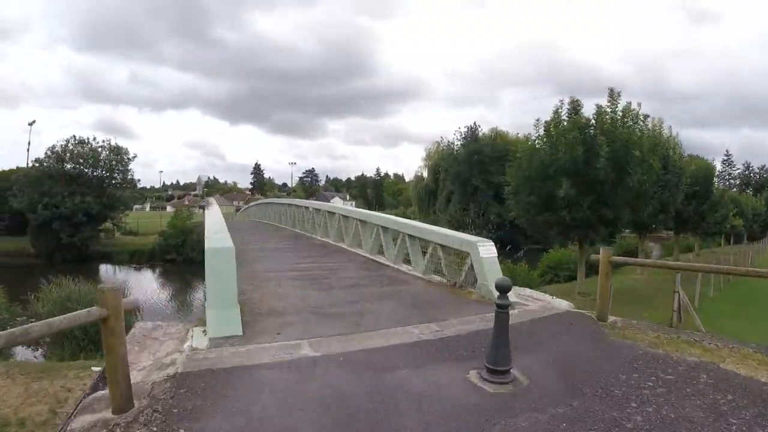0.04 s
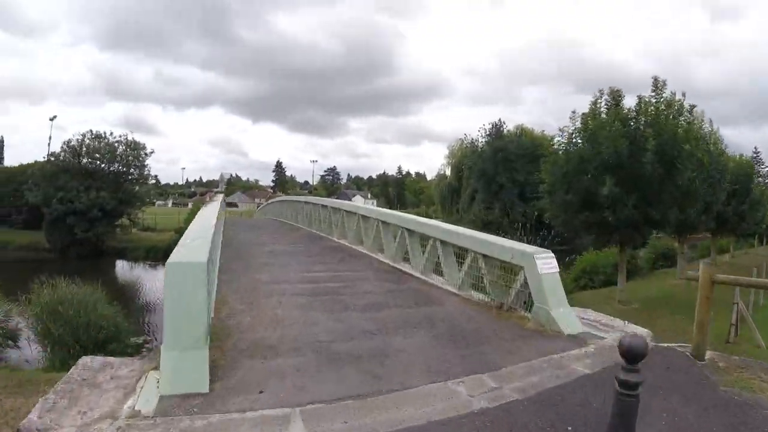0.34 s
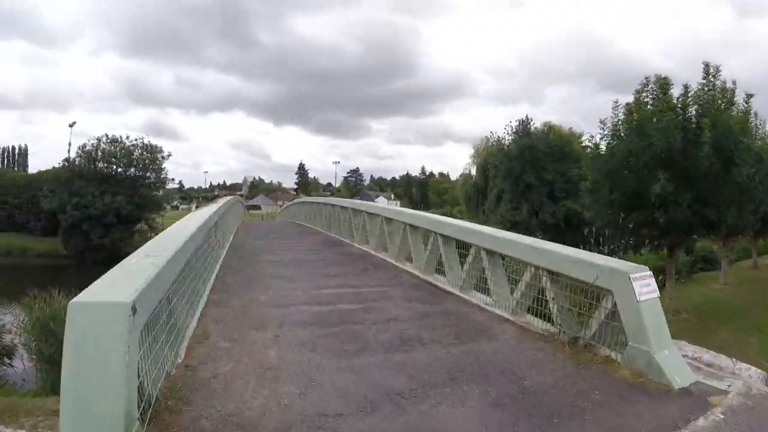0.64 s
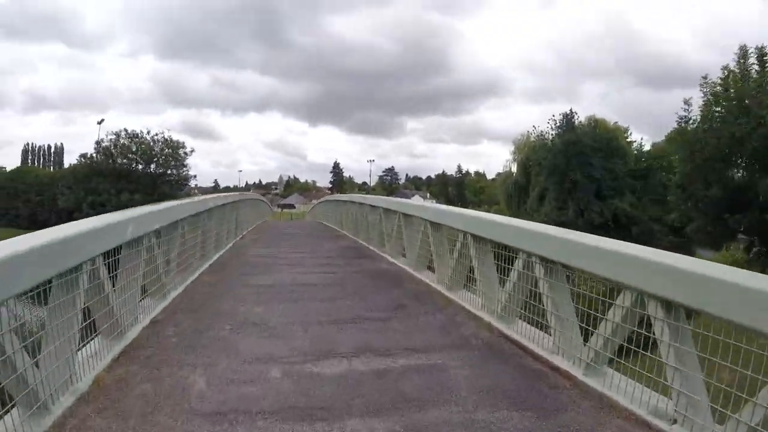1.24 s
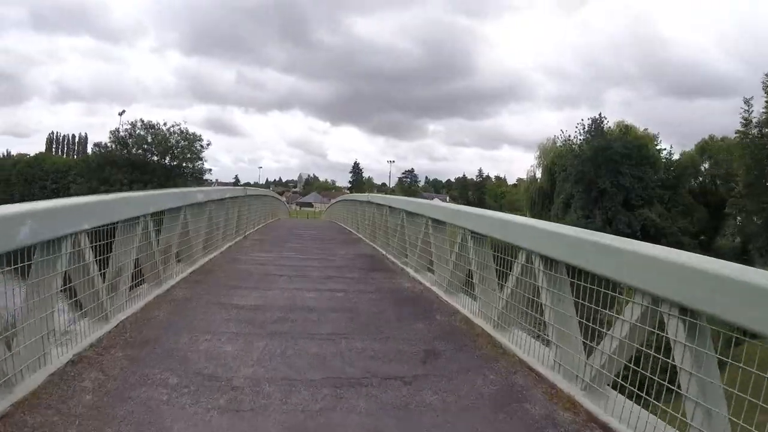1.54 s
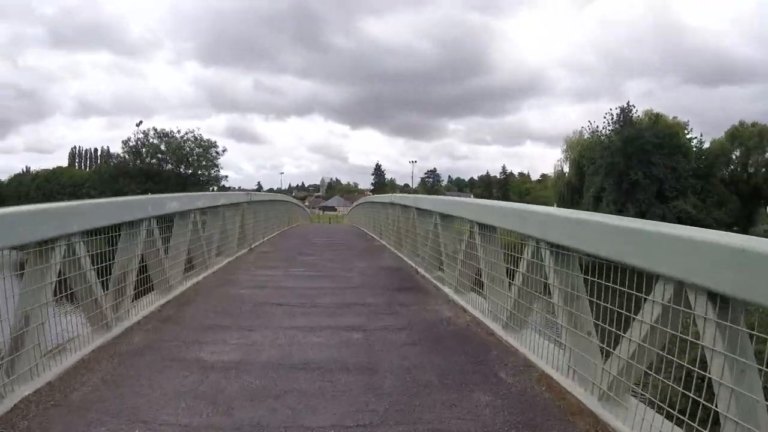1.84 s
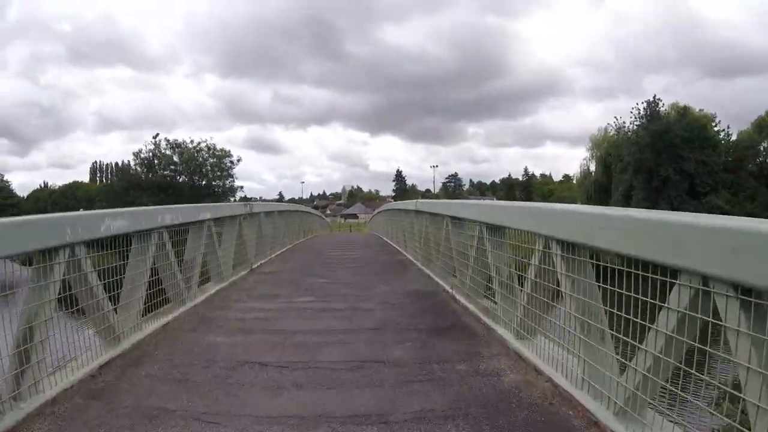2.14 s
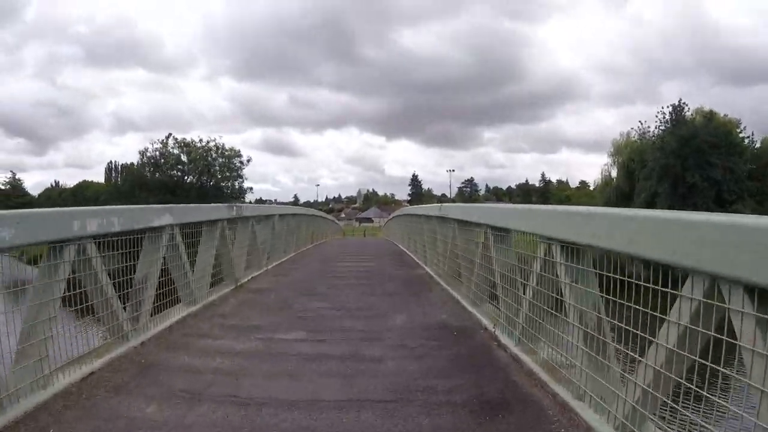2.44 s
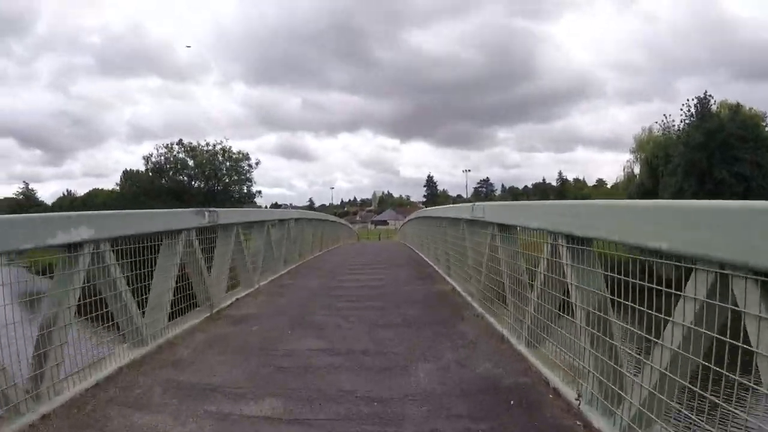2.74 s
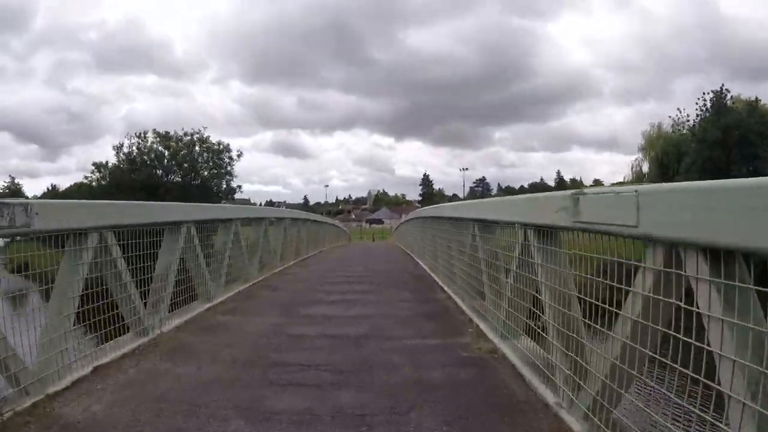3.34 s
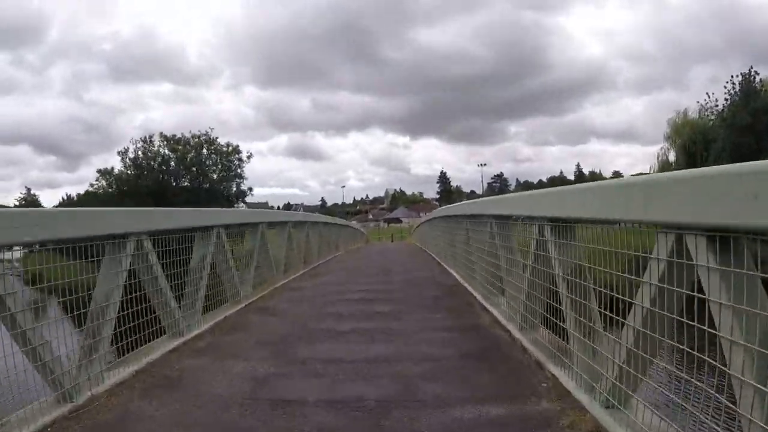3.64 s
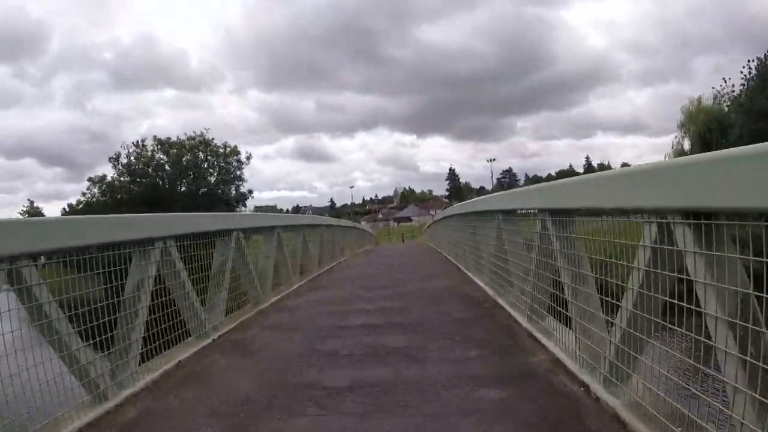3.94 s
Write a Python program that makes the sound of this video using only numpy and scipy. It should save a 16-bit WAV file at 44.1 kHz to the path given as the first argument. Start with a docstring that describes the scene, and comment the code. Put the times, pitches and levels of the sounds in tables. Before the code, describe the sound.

Sharp rattles and clicks from a bicycle rolling across a footbridge, over a low rumble.

```python
"""A metal footbridge, heard from a bicycle that rolls onto it from asphalt.
The tyres roar, flick grit and keep the frame humming, while wind buffets the microphone.
Shaken small parts chatter and clink, a loose fitting knocks sharply, and ridges in the deck
thump through the frame and set it ringing."""
import sys
import numpy as np
from scipy import signal
from scipy.fft import rfft, irfft
from scipy.io import wavfile
from scipy.ndimage import uniform_filter1d, minimum_filter1d

SR = 44100
rng = np.random.default_rng(int(sys.argv[2]) if len(sys.argv) > 2 else 0)


def wrap_up_sound(samples):
    """Save the sound to the file named by the first command line argument, as 16-bit audio."""
    columns = np.atleast_2d(samples).T
    # keep every value between -1 and 1, then stretch to whole-number steps
    tamed = np.clip(columns, -1, 1)
    steps = np.round(tamed * 32767).astype(np.int16)
    wavfile.write(sys.argv[1], SR, steps)


N = 176400
T = np.arange(N) / SR
FREQS = np.fft.rfftfreq(N, 1 / SR)


def amp(db):
    """Decibels to gain."""
    return 10 ** (np.asarray(db) / 20)


def unit(x):
    """Scales to rms 1."""
    return x / np.sqrt(np.mean(abs(x) ** 2) + 1e-20)


def fader(curve):
    """Gain over time from (time_s, level_db) points."""
    return amp(np.interp(T, *np.transpose(curve)))


def eq_gain(colour, hz):
    """Gain over frequency from (freq_hz, gain_db) points."""
    points_hz, db = np.transpose(colour)
    return amp(np.interp(np.log(hz + 1), np.log(points_hz + 1), db))


def add(mix, start_s, sound):
    """Mixes a sound in at start_s."""
    part = mix[max(round(start_s * SR), 0):][:len(sound)]
    part += sound[:len(part)]


def noise(colour):
    """Steady noise of a given colour, rms 1."""
    return unit(irfft(rfft(rng.standard_normal(N)) * eq_gain(colour, FREQS), N))


def drift(rate_hz):
    """Random motion, mostly slower than rate_hz, rms 1."""
    return unit(irfft(rfft(rng.standard_normal(N)) / (1 + (FREQS / rate_hz) ** 2) ** 2, N))


def click(colour, size=2048):
    """The shortest causal pulse of a given colour, peak 1."""
    log_gain = np.log(eq_gain(colour, abs(np.fft.fftfreq(size, 1 / SR))))
    pulse = np.fft.ifft(np.exp(np.conj(signal.hilbert(log_gain)))).real
    return pulse / abs(pulse).max()


def roughen(sound, tail_db, decay_s, size=2048):
    """Gives a sound a random, quickly dying tail."""
    response = rng.standard_normal(size) * np.exp(-np.arange(size) / SR / decay_s)
    response *= amp(tail_db) / np.linalg.norm(response)
    response[0] = 1  # the direct sound
    return signal.fftconvolve(sound, response)


def attack(t, rise_s):
    """A smooth onset from 0 to 1."""
    return 1 - np.exp(-(t / rise_s) ** 2)


def mode(t, hz, t60_s, phase_turns=0):
    """One resonance, dying by 60 dB in t60_s."""
    return np.exp(-np.log(1000) * t / t60_s) * np.sin(2 * np.pi * (hz * t + phase_turns))


# fader rides for the tyre roar and the tread hiss: time_s, level_db
ROAR_FADER = [(0, -23.5), (.3, -22.5), (.8, -22), (.92, -25), (1.08, -25.5), (1.17, -18.5), (1.42, -29),
              (1.47, -20.5), (1.7, -24), (2.03, -18), (2.22, -30), (2.38, -18), (2.52, -27), (2.66, -19.5),
              (2.83, -27), (2.9, -18.5), (3.08, -22.5), (3.35, -24.5), (3.65, -28.5), (4, -22.5)]
HISS_FADER = [(0, -43.5), (.75, -41.5), (.95, -46.5), (2, -46), (3, -48), (3.6, -50), (4, -49)]
# EQ of the dark roar and the thin hiss: freq_hz, gain_db
ROAR_EQ = [(140, -19), (180, 7), (210, 0), (242, 4.5), (275, 2.5), (320, -9.5), (380, -4), (405, -6),
           (480, -4), (560, -3.5), (600, -13.5), (670, -7.5), (760, -22.5), (1000, -39), (1250, -42),
           (2500, -59), (16000, -120)]
HISS_EQ = [(400, -31.5), (950, 13), (1250, -0.5), (1550, 5), (2000, -5.5), (2550, -31.5), (3300, -31),
           (4500, -37), (5500, -26.5), (6300, -26), (7800, -27), (9500, -31), (12000, -40), (16000, -42.5)]
def tyres(roar_db=6.5):
    """Rolling tyres lay down a lumpy low roar and a faint hiss of tread."""
    roar = unit(noise(ROAR_EQ) * amp(1.7 * drift(rate_hz=21)))
    hiss = noise(HISS_EQ) * amp(0.74 * drift(rate_hz=160))
    return amp(roar_db) * fader(ROAR_FADER) * roar + fader(HISS_FADER) * hiss


# fader ride for the frame's drone: time_s, level_db
HUM_FADER = [(0.0, -12.5), (0.18, -21), (0.27, -10), (0.31, -25), (0.47, -12.5), (0.5, -21.5), (0.77, -11),
             (0.82, -30.5), (1.07, -13), (1.16, -22.5), (1.35, -12.5), (1.48, -27), (1.6, -14.5),
             (1.82, -18.5), (1.93, -15), (1.97, -27), (2.31, -14.5), (2.41, -21.5), (2.45, -12.5),
             (2.57, -22.5), (2.93, -13.5), (2.97, -22), (3.34, -9), (3.4, -43.5), (3.44, -18), (4.0, -13.5)]
def frame_hum(pitch_hz=127.55, waver_hz=18.6, trim_db=1.64):
    """The frame's lowest resonance wavers under the random push of the road."""
    sway = drift(waver_hz) + 1j * drift(waver_hz)
    sway /= (abs(sway) + 0.033) ** 0.55  # partly evens out the level
    drone = unit((sway * np.exp(2j * np.pi * pitch_hz * T)).real)
    return amp(trim_db) * fader(HUM_FADER) * drone


# EQ of the wind, mostly sub-bass: freq_hz, gain_db
WIND_EQ = [(5, -6), (18, 3), (30, 1), (50, -4), (90, -3), (130, -9), (200, -17), (500, -42), (2000, -90),
           (16000, -130)]
def wind(level_db=-17):
    """Gusts buffet the microphone with a deep rumble."""
    gusts = amp(1.2 * drift(rate_hz=10))
    return amp(level_db) * unit(noise(WIND_EQ) * gusts)


# EQ of a bright grain of grit: freq_hz, gain_db
GRIT_EQ = [(2000, -16), (3200, -8.5), (6400, -6.5), (9500, -11.5), (16000, -10)]
def grit(ticks_per_s=23, level_db=-71.5):
    """The tread flicks up fine grit in sparse, tiny ticks."""
    strengths = amp(3 * np.minimum(rng.exponential(1, N), 3))
    grains = strengths * (rng.random(N) < ticks_per_s / SR)
    tick = roughen(click(GRIT_EQ), tail_db=3.5, decay_s=0.0054)
    return amp(level_db) * unit(signal.oaconvolve(grains, tick)[:N])


# EQ of a small part's tick: freq_hz, gain_db
PART_EQ = [(300, 7), (950, 10.5), (1300, 0), (2000, -3), (2700, -17.5), (3300, -18.5), (4500, -38.5),
           (5500, -24.5), (6400, -18.5), (7700, -32), (9200, -34), (11500, -46), (16000, -77.5)]
# flurries of rattling: centre_s, length_s, level_db
CHATTER_BURSTS = [(0.025, 0.016, -24), (0.842, 0.0094, -20), (0.931, 0.018, -31), (1.116, 0.013, -31.5),
                  (1.15, 0.035, -27), (1.223, 0.01, -31), (1.595, 0.023, -32), (1.682, 0.025, -25.5),
                  (1.751, 0.027, -32), (1.823, 0.046, -26.5), (1.927, 0.016, -26), (2.324, 0.012, -23.5),
                  (2.393, 0.088, -31.5), (2.477, 0.0059, -24.5), (2.541, 0.035, -31.5),
                  (2.674, 0.13, -32.5), (2.825, 0.021, -27.5), (2.95, 0.017, -16), (2.97, 0.0085, -24),
                  (3.032, 0.068, -34.5), (3.079, 0.013, -22.5), (3.163, 0.03, -32), (3.238, 0.02, -27.5),
                  (3.316, 0.035, -35), (3.493, 0.044, -37.5), (3.776, 0.023, -28.5), (3.843, 0.084, -39)]
def chatter(parts=10, base_ticks_per_s=220, idle_db=-45.5, spread_db=4.5, eq_spread_db=5):
    """Small parts, each with its own brief ring, tick in bursts as the bicycle shakes."""
    shake = amp(idle_db + drift(rate_hz=25))
    for centre_s, length_s, level_db in CHATTER_BURSTS:
        shake += amp(level_db) * np.exp(-(2 * (T - centre_s) / length_s) ** 2)
    strengths = amp(spread_db * np.minimum(rng.exponential(1, N), 3)) * rng.choice([-1, 1], N)
    pace = amp(3.6 * drift(rate_hz=400))
    ticks_so_far = np.floor(np.cumsum(pace) * base_ticks_per_s / SR)
    contacts = shake * unit(strengths * (np.diff(ticks_so_far, prepend=0) > 0))
    struck_part = rng.integers(0, parts, N)
    out = np.zeros(N)
    for part in range(parts):
        colour = [(hz, db + eq_spread_db * rng.uniform(-0.37, 1)) for hz, db in PART_EQ]
        tick = roughen(click(colour), tail_db=3.5, decay_s=0.0054)
        out += signal.oaconvolve(contacts * (struck_part == part), tick / np.linalg.norm(tick))[:N]
    return out


# EQ of a knock's dull body, dry crack and bright tick: freq_hz, gain_db
BODY_EQ = [(100, -17.5), (450, 7), (1000, 5.5), (1250, -0.5), (1550, 3.5), (2050, -2), (2600, -17.5),
           (3200, -15.5), (4400, -58), (6000, -41), (9000, -53.5), (17000, -88)]
CRACK_EQ = [(1000, -19), (2500, -1.5), (4100, 9), (4700, 0), (5700, 10), (8000, -7.5), (10800, -8.5),
            (11800, -12), (16000, -14)]
TICK_EQ = [(1500, -15), (4600, -26), (5500, -7), (6150, -2), (7500, -17.5), (8600, -10), (10800, -13),
           (12000, -30), (16000, -35)]
# short rings of the loose fitting: pitch_hz, level_db, t60_s
FITTING_MODES = [(1036, -37.5, 0.042), (1410, -34.5, 0.027), (1680, -30.5, 0.046), (2160, -25, 0.045),
                 (2850, -44, 0.017)]
# knock cues, with tick and crack relative to the body: start_s, level_db, tick_db, crack_db
KNOCK_CUES = [(0.16, -16.5, -43, -46), (0.805, -0.5, -26, -13), (0.8194, -11, -38, -36),
              (.8564, 6, -14, -33), (1.0687, -18.5, -37.5, -38.5), (1.144, 2, -31, -30),
              (1.3719, 2, -16.5, -29), (1.4684, -1, -17, -33), (1.479, -5, -17, -26),
              (1.6873, 5.5, -14, -47), (1.729, -13, -30, -45), (1.8403, 1, -20.5, -25),
              (1.931, -6, -22.5, -38), (2.0516, -8, -35, -26), (2.0558, -5.5, -37, -43),
              (2.3042, 3, -22, -21.5), (2.3681, -2.5, -13, -37), (2.5809, -1.5, -26, -17.5),
              (2.7541, 0, -17.5, -31), (2.759, -1, -12.5, -29), (2.792, -16, -38, -33),
              (2.9522, -5, -30, -39), (3.0873, -2, -22, -54), (3.092, -9.5, -25, -22),
              (3.2393, -17.5, -32, -25.5)]
def knocks(ring_spread_db=3, detune=0.06):
    """The loose fitting strikes with a dull pulse, a ring and a crack; its contact grates into a tick."""
    out, t = np.zeros(N), np.arange(2048) / SR
    for start_s, level_db, tick_db, crack_db in KNOCK_CUES:
        body, crack, tick = (click([(hz * (1 + detune * rng.uniform(-0.87, 1)), db) for hz, db in eq])
                             for eq in (BODY_EQ, CRACK_EQ, TICK_EQ))
        ring = sum(amp(db + ring_spread_db * rng.standard_normal()) * mode(t, hz, t60_s)
                   for hz, db, t60_s in FITTING_MODES)
        grate = roughen(tick, tail_db=0, decay_s=0.0011)[:len(t)]
        hit = body + ring + amp(tick_db) * grate + amp(crack_db) * crack
        add(out, start_s, -amp(level_db) * roughen(hit, tail_db=-13.5, decay_s=0.0029))
    return out


# cues for the larger grains: start_s, peak_db
SNAP_CUES = [(0.24, -46), (.342, -35), (.943, -37), (1.01, -45.5), (1.443, -48), (2.111, -35), (3.245, -43),
             (3.545, -39), (3.913, -32)]
def grit_snaps():
    """Single grains snap off the tread, dry and very bright."""
    out = np.zeros(N)
    for start_s, peak_db in SNAP_CUES:
        add(out, start_s, amp(peak_db) * click(GRIT_EQ))
    return out


# ringing notes of the frame: pitch_hz, level_db, t60_s
FRAME_MODES = [(247.5, -7, 0.22), (276.4, -11, 0.13), (374, -17, 0.27), (450.4, -12.5, 0.11),
               (488.5, -8.5, 0.11), (546.2, -9.5, 0.11), (663.8, -4.5, 0.068)]
# cues for the ridges in the deck: start_s, hit_db, heave_db
RIDGE_CUES = [(0.343, -9, -8.5), (.843, -6, -4), (1.161, -2, -11), (1.227, -6.5, -12.5), (1.438, -6, -6),
              (1.561, -7, -21), (1.623, -7.5, -7), (1.754, -7.5, -14), (1.811, -4, -3), (1.9, -8.5, -12),
              (1.974, -7.5, -7), (2.109, -15, -12.5), (2.191, -12, -24), (2.326, -9, -8.5),
              (2.384, -12, -12.5), (2.534, -6.5, -5), (2.617, -4.5, -11.5), (2.672, -3.5, -8),
              (2.718, -9, -8), (2.861, -4, -13), (2.971, -10, -34), (3.003, -9.5, -17), (3.039, -5, -7),
              (3.117, -8.5, -12.5), (3.177, -7, -27), (3.229, -7, -5.5), (3.284, -10, -11.5),
              (3.372, -8, -11.5), (3.411, -11.5, -6.5), (3.464, -13, -20), (3.537, -6.5, -8.5),
              (3.711, -14, -12), (3.815, -11, -21), (3.904, -6.5, -4)]
def deck_ridges(thump_trim_db=-7, ring_trim_db=1.5, heave_trim_db=-3.5):
    """A ridge sends a thump through tyre and frame, highs first; the frame heaves and its modes ring."""
    from_hz, to_hz, glide_s, decay_s, heave_peak_s = 737, 254, 0.00774, 0.013, 0.02
    out, t = np.zeros(N), np.arange(SR // 4) / SR
    glide_hz = to_hz + (from_hz - to_hz) * np.exp(-t / glide_s)
    thump_phase = 2 * np.pi * np.cumsum(glide_hz) / SR
    thump_shape = attack(t, rise_s=0.00076) * np.exp(-t / decay_s)
    heave_shape = (t / heave_peak_s) * np.exp(1 - t / heave_peak_s)
    for start_s, hit_db, heave_db in RIDGE_CUES:
        heave_hz = 232.3 * (1 + 0.08 * rng.uniform(-0.99, 1))
        heave = heave_shape * np.sin(2 * np.pi * heave_hz * t)
        thump = thump_shape * np.sin(thump_phase * (1 + 0.078 * rng.uniform(-1.04, 1)))
        ring = sum(amp(db) * mode(t, hz, t60_s, rng.random()) for hz, db, t60_s in FRAME_MODES)
        hit = amp(thump_trim_db) * thump + amp(ring_trim_db) * ring * attack(t, rise_s=0.0024)
        add(out, start_s, amp(hit_db) * hit + amp(heave_db + heave_trim_db) * heave)
    return out


# cues for lone clinks: start_s, tick_db, note_db
CLINK_CUES = [(0.925, -26.5, -42), (.974, -29.5, -42), (1.24, -16.5, -30), (1.593, -23, -35),
              (1.651, -26, -32), (1.7565, -23, -32), (1.775, -22, -36), (2.015, -19, -35),
              (2.082, -24, -37), (2.1036, -18, -26), (2.1933, -17.5, -24), (2.281, -26, -31),
              (2.608, -30, -31), (2.644, -19, -33), (2.701, -26, -13.5), (2.887, -18, -33),
              (3.043, -23, -36), (3.145, -17.5, -18.5), (3.3195, -26.5, -39), (3.4926, -22, -38),
              (3.769, -20.5, -32)]
def clinks(pitch_hz=1970, decay_s=0.0015, eq_spread_db=5):
    """A small part strikes once: a rough tick of its own colour and one quickly damped note."""
    out, t = np.zeros(N), np.arange(2048) / SR
    note = attack(t, rise_s=0.0007) * np.exp(-t / decay_s) * np.sin(2 * np.pi * pitch_hz * t)
    for start_s, tick_db, note_db in CLINK_CUES:
        colour = [(hz, db + eq_spread_db * rng.uniform(-1, 1)) for hz, db in PART_EQ]
        add(out, start_s, amp(tick_db) * roughen(click(colour), tail_db=0, decay_s=0.0011))
        add(out, start_s, amp(note_db) * note)
    return out


def scene():
    """The hits over the rolling bed, mixed to mono."""
    hits = knocks() + clinks() + chatter() + grit() + grit_snaps() + deck_ridges()
    bed = frame_hum() + tyres() + wind()
    return (hits + bed)[None]


def record(dry, ceiling_db=-0.3, release_db_per_s=85, cutoff_hz=16000):
    """A fast peak limiter with a slow release, then a steep low-pass."""
    over_db = np.maximum(20 * np.log10(abs(dry[0]) + 1e-9) - ceiling_db, 0)
    release_db = T * release_db_per_s
    duck_db = release_db - np.maximum.accumulate(over_db + release_db)
    held_db = minimum_filter1d(duck_db, size=65)  # ducks just ahead of each peak
    smooth_db = uniform_filter1d(uniform_filter1d(held_db, size=33), size=33)
    lowpass = signal.firwin(511, cutoff_hz, window=("kaiser", 9), fs=SR)
    return signal.oaconvolve(dry * amp(smooth_db), lowpass[None], "same")


dry = scene()
out = record(dry)
wrap_up_sound(out)
```